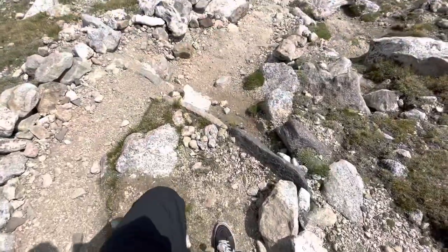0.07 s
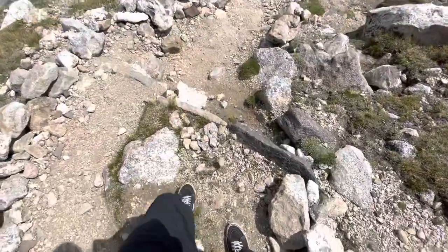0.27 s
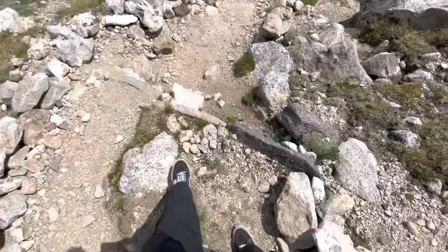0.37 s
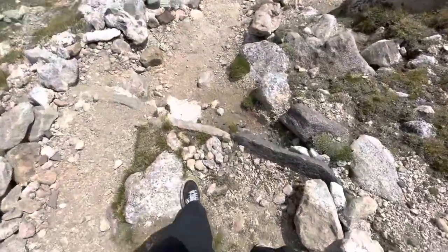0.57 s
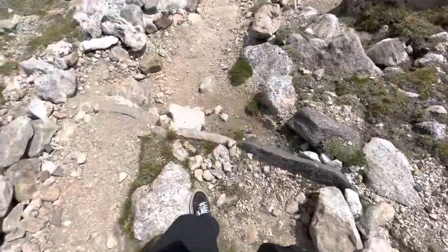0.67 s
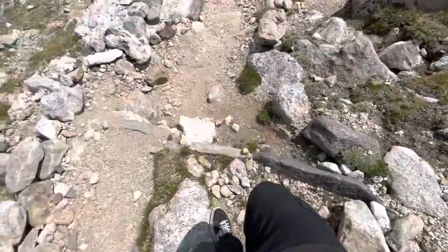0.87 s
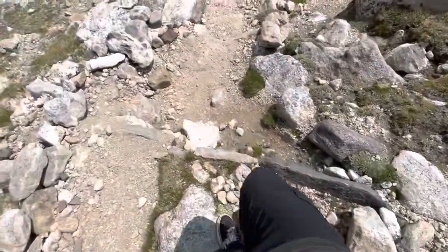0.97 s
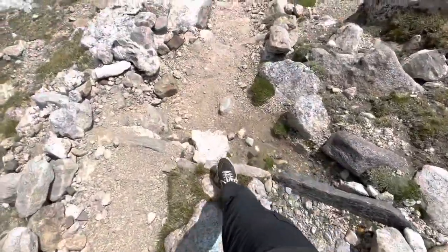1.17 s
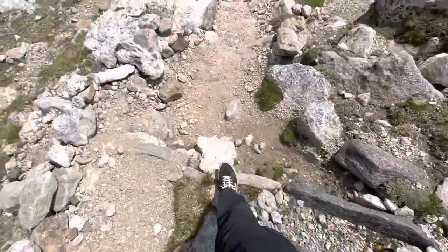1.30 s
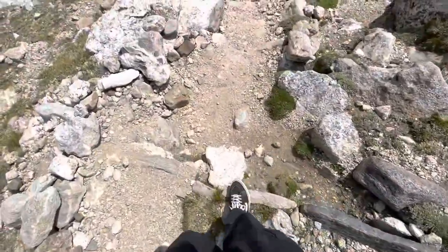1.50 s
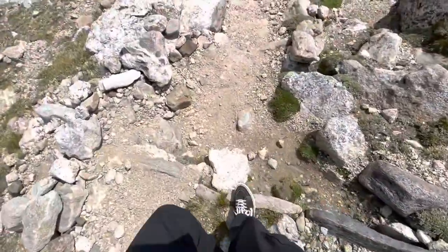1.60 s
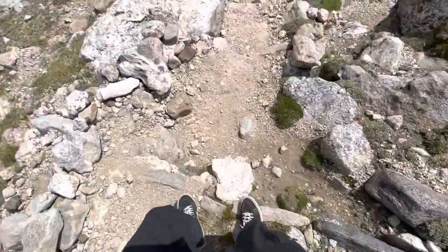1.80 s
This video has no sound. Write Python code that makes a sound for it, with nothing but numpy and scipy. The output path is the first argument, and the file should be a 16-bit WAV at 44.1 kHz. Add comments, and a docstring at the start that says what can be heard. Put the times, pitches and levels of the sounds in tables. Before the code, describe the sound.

Shoes take two steps over loose stones and gravel, knocking small rocks together.

```python
"""Two steps on a dry, stony mountain trail, heard from the walker's chest.
The first lands as a cluster of loose stones knocking under the shoe: hard clack, hollow body, a spit
of grit and, just after, a low thud. Pebbles tick and gravel crunches as the weight rolls on, then
trousers swish and the sole scuffs. At 1.25 s the second lands with one clack, trailed by a scuff, more
pebbles, gravel and a last swish. Soft stride bumps, air rumble and a faint hiss lie underneath."""
import sys
import numpy as np
from scipy import signal
from scipy.fft import rfft, irfft
from scipy.io import wavfile

SR = 44100
rng = np.random.default_rng(int(sys.argv[2]) if len(sys.argv) > 2 else 0)


def inscribe(sig):
    """Save sig as 16-bit PCM at rate SR to the path in sys.argv[1].

    A 1-D sig is mono; a 2-D sig holds one channel per row.
    Samples are clipped to [-1, 1] before scaling.
    """
    pcm = np.round(np.clip(np.atleast_2d(sig).T, -1, 1) * 32767)
    wavfile.write(sys.argv[1], SR, pcm.astype(np.int16))


N = 81585
TIME = np.arange(N) / SR
HIT = int(.12 * SR)   # samples in a one-shot
AGE = np.arange(HIT) / SR
IMPULSE = 1.0 * (AGE == 0)
CLACK_PAN_DB = -3.2   # every pan is left minus right


def knocks():
    """Stone hits stone under the shoe: a clack in a broad snap, hollow body, grit and a low thud."""
    # Stone impacts: start_s, clack_db, clack_hz, clack_octaves, body_db, body_hz, thud_db, thud_hz,
    # grit_db, grit_hz, roughness (0-1), settle_db
    impacts = [(0.246, -10.5, 3650, 1.04, -21, 1200, -38, 344, -19, 11030, 0.87, -7.5),
               (0.248, -8, 3480, 0.65, -17.5, 1200, -24.5, 350, -15.5, 9800, 0.2, -10),
               (0.2995, 3.5, 4870, 0.82, -6, 985, -7.5, 313, 3, 10100, 0.56, -9.5),
               (0.3133, -12, 3770, 1.66, -46, 1000, -23.5, 204, -21, 10600, 0.5, -10),
               (0.432, -18.5, 3100, 1.4, -19, 754, -18, 472, -20, 9000, 0.2, -3),
               (0.4336, -14, 2930, 1.2, -17.5, 1110, -23, 422, -2, 8700, 0.19, -13),
               (0.4428, -3.5, 3150, 1.31, -12.5, 810, -10, 416, -44, 10500, 0.27, -9),
               (.5650, -1, 2770, 0.99, -8.5, 1536, -21.5, 395, -26.5, 10500, 0.14, -20.5),
               (1.249, 2, 2580, 1.22, -7.5, 926, -12.5, 183, -44, 9700, 0.04, -19.5)]
    out = np.zeros((2, N))
    for (start_s, clack_db, clack_hz, octaves, body_db, body_hz, thud_db, thud_hz,
         grit_db, grit_hz, rough, settle_db) in impacts:
        clack = from_db(clack_db) * strike(clack_hz, octaves, rough, settle_db, CLACK_PAN_DB)
        body = from_db(body_db) * strike(body_hz, 1.36, rough / 2, settle_db, pan_db=2.2)
        grit = from_db(grit_db) * strike(grit_hz, 1, rough, settle_db, pan_db=-.6)
        snap = strike(0.754 * clack_hz, 1.59, rough / 2, settle_db, CLACK_PAN_DB)
        snap *= from_db(clack_db - 10.5)
        add(out, start_s, clack + snap + body + grit + from_db(thud_db) * thud(thud_hz))
    return out


def strike(hz, octaves, rough, settle_db, pan_db):
    """A contact excites one damped resonance, with a little scatter between left and right."""
    direct = band(contact(rough, settle_db), hz, octaves, order=4)
    scatter = from_db(-12) * band(contact(0.99, settle_db), hz, octaves, order=4)
    return pan(np.array([direct + scatter, direct - scatter]), pan_db)


def contact(rough, settle_db):
    """One impact with a rasp of crushed sand, a reflection off nearby rock and a tail of settling grit."""
    rasp_s, echo_s, settle_s = .0008, .0016, .0082
    rasp = unit(rng.standard_normal(HIT) * np.exp(-AGE / rasp_s))
    settling = unit(rng.standard_normal(HIT) * np.exp(-AGE / settle_s))
    impact = np.sqrt(1 - rough) * IMPULSE + np.sqrt(rough) * rasp
    echo = from_db(-12) * np.roll(impact, int(echo_s * SR))
    return impact + echo + from_db(settle_db) * settling


def thud(hz):
    """A low thud sounds a few milliseconds after the clack, later the lower its pitch."""
    lag_s = 0.87 / hz
    return np.roll(band(IMPULSE, hz, octaves=0.98, order=3), int(lag_s * SR))


def pebbles():
    """Small stones tip and tick, each with a light thud."""
    # Pebble ticks: start_s, level_db, pitch_hz
    ticks = [(0.3355, -28.5, 3050), (0.359, -23.5, 2070), (0.3695, -20, 1730), (0.393, -22, 2150),
             (0.4007, -27.5, 7400), (0.42, -28, 6500), (0.4513, -28, 9100), (0.4626, -34, 1410),
             (.504, -26, 1020), (.516, -21.5, 760), (0.551, -30, 1660), (0.597, -24.5, 1930),
             (0.616, -26.5, 1424), (0.6473, -16, 1250), (.673, -28, 1520), (0.682, -28.5, 1620),
             (0.694, -32, 1680), (0.7119, -22, 1200), (.718, -44, 1460), (0.787, -35, 1580),
             (1.283, -23.5, 1200), (1.2876, -29.5, 2150), (1.43, -26, 2060), (1.443, -27.5, 1140),
             (1.475, -28, 1170), (1.492, -27.5, 700)]
    out = np.zeros((2, N))
    for start_s, level_db, pitch_hz in ticks:
        tick = strike(pitch_hz, octaves=1.65, rough=0.46, settle_db=-3.5, pan_db=-3)
        add(out, start_s, from_db(level_db) * (tick + from_db(-7.5) * thud(hz=497)))
    return out


def scuffs():
    """The sole slips briefly over sand and sets stone chips clinking."""
    # Slips of the sole: start_s, length_s, level_db, pitch_hz
    slips = [(0.871, 0.0067, -31.5, 3680), (0.958, 0.0041, -36.5, 2640), (1.088, 0.0025, -28.5, 4850),
             (1.369, 0.012, -18, 3900)]
    # Ringing modes of the chips: pitch_hz, level_db, t60_s
    chip_modes = [(2820, 3, 0.0086), (3690, 2.5, 0.016), (4300, 5, 0.024), (4650, -3, .018)]
    ring = sum(from_db(db - 60 * AGE / t60) * np.sin(2 * np.pi * hz * AGE) for hz, db, t60 in chip_modes)
    out = np.zeros((2, N))
    for start_s, length_s, level_db, pitch_hz in slips:
        swell = np.sin(np.pi * np.minimum(AGE / length_s, 1))
        rub = rng.standard_normal(HIT) * rng.exponential(1, HIT) * swell
        scrape = band(rub, pitch_hz, octaves=1)
        clink = from_db(-4) * unit(signal.fftconvolve(rub, ring)[:HIT])
        dust = from_db(-4.5) * unit(rub)
        add(out, start_s, pan(from_db(level_db) * (scrape + clink + dust), CLACK_PAN_DB))
    return out


def bumps():
    """Dull jolts as the leg swings and lands."""
    # Jolts of the stride: start_s, level_db, pitch_hz, pan_db
    jolts = [(0.517, -22.5, 176, -1), (.612, -24, 340, -1), (0.663, -28, 65, 6), (0.89, -28, 237, -1),
             (1.093, -18, 144, 1), (1.120, -26.5, 70, 17), (1.177, -29.5, 80, 17), (1.217, -22, 128, 21),
             (1.251, -25.5, 81, 25), (1.364, -24.5, 95.5, 12), (1.751, -32.5, 74, 14)]
    out = np.zeros((2, N))
    for start_s, level_db, pitch_hz, pan_db in jolts:
        jolt = from_db(level_db) * band(IMPULSE, pitch_hz, octaves=0.81, order=3)
        add(out, start_s, pan(jolt, pan_db))
    return out


def gravel():
    """Gravel crunches under the walker's weight: separate grains over a wash of noise."""
    # Crunch envelope: time_s, level_db
    envelope = [(0, -47), (.1, -58), (.22, -60), (.29, -57), (.32, -56), (.41, -53.5), (.46, -57),
                (.49, -59.5), (.53, -58), (.58, -56), (.72, -55), (.82, -55.5), (.95, -62.5), (1.06, -62.5),
                (1.2, -63.5), (1.31, -58), (1.39, -59.5), (1.44, -48.5), (1.485, -51.5), (1.53, -58),
                (1.6, -57.5), (1.68, -63.5), (1.85, -71)]
    # Gravel tone: frequency_hz, gain_db
    tone = [(30, -18), (100, -6), (200, -5), (380, -1), (750, -5.5), (1200, -8), (2500, -15.5),
            (5000, -12.5), (9000, -24.5), (16000, -44)]
    grain_share = .65   # of the power
    clicks = np.sqrt(grain_share) * colour(grains(per_s=330), tone)
    wash = np.sqrt(1 - grain_share) * colour(noise(alike=0.17), tone)
    return curve(envelope) * (clicks + wash)


def sand():
    """Fine sand crackles under the sole in dense, bright clicks."""
    # Crackle envelope: time_s, level_db
    envelope = [(0, -59.5), (.2, -68.5), (.29, -75), (.325, -54), (.36, -53.5), (.41, -72), (.46, -65),
                (.51, -68), (1.0, -79), (1.05, -57), (1.12, -80), (1.36, -71), (1.44, -63), (1.6, -69.5),
                (1.85, -75)]
    # Sand tone: frequency_hz, gain_db
    tone = [(500, -22), (2000, -7), (3500, -1), (6000, -2), (8500, 0), (12000, -3), (15000, -4),
            (16000, -10)]
    return curve(envelope) * colour(grains(per_s=1300), tone)


def trousers():
    """Trouser legs brush past each other once in each stride."""
    # Cloth swishes: peak_s, width_s, level_db
    swishes = [(.76, 0.032, -68.5), (1.58, 0.053, -67)]
    swell = sum(from_db(db) * np.exp(-.5 * ((TIME - s) / width) ** 2) for s, width, db in swishes)
    cloth = band(noise(alike=.3), hz=7450, octaves=0.51)
    return swell * cloth / cloth.std()


def air():
    """Moving air rumbles on the microphone, heavier on the left."""
    # Rumble envelope: time_s, level_db
    envelope = [(0, -65.5), (.2, -69), (.45, -61.5), (.55, -57), (.7, -64), (.85, -67), (1.03, -83),
                (1.14, -58), (1.3, -54), (1.45, -75), (1.56, -58.5), (1.69, -83), (1.85, -58)]
    # Rumble tone: frequency_hz, gain_db
    tone = [(20, -9), (35, -0.5), (60, -1), (110, 2), (200, -5.5), (500, -18), (2000, -62)]
    return pan(curve(envelope) * colour(noise(alike=0.033), tone), db=5)


def hiss():
    """A faint, steady, wide noise bed."""
    # Hiss tone: frequency_hz, gain_db
    tone = [(20, -9.5), (60, 14), (150, 3.5), (400, 11), (1000, 3), (2500, 2.5), (4500, -4), (5600, -1.5),
            (6500, 7.5), (7600, -9.5), (9200, 0.5), (10700, -56), (12500, -5.5), (14800, -22), (16000, -25)]
    return from_db(-63.5) * colour(noise(alike=0.1), tone)


def port_tone(pair):
    """The two microphone ports put peaks and notches in the treble from the ground."""
    # Port response: frequency_hz, gain_db
    response = [(3000, 0), (3700, -1), (4300, -2), (5100, 1.5), (5750, -10), (6600, -4), (7400, -10),
                (8100, 3), (9300, 3), (10500, -4), (11900, 0), (12900, -6), (15000, -1), (16000, -6)]
    return shape(pair, response)


def port_lag(pair, share):
    """Sound from the ground reaches the right port a little later; share scales the lag."""
    # Full lag of the right port: frequency_hz, lag_rad
    full_lag = [(100, 0), (1000, .25), (2200, .3), (3000, 1.4), (3700, 2.1), (5000, 2.8), (8000, 2),
                (10500, 2.2), (12000, 1), (13000, .1), (16000, 0)]
    lag = share * np.interp(np.fft.rfftfreq(N, 1 / SR), *np.transpose(full_lag))
    return np.array([pair[0], irfft(rfft(pair[1]) * np.exp(-1j * lag), N)])


def grains(per_s):
    """Random clicks of uneven size."""
    spread_db = 3.5
    sizes = from_db(spread_db * np.minimum(rng.exponential(1, N), 4)) * rng.choice([-1, 1], N)
    return sizes * (rng.random(N) < per_s / SR)


def noise(alike):
    """Stereo white noise; alike is the share of power common to both sides."""
    white = rng.standard_normal((3, N))
    return np.sqrt(alike) * white[2] + np.sqrt(1 - alike) * white[:2]


def band(x, hz, octaves, order=2):
    """A broad, heavily damped resonance; energy 1."""
    edges = np.clip([hz / 2 ** (octaves / 2), hz * 2 ** (octaves / 2)], 10, .47 * SR)
    return unit(signal.sosfilt(signal.butter(order, edges, "band", fs=SR, output="sos"), x + 1e-18))


def shape(x, points):
    """EQ through (frequency_hz, gain_db) points."""
    hz, db = np.transpose(points)
    gain_db = np.interp(np.log(np.fft.rfftfreq(N, 1 / SR) + 1), np.log(hz), db)
    return irfft(rfft(x) * from_db(gain_db), N)


def colour(x, points):
    """EQ, then scale to rms 1."""
    shaped = shape(x, points)
    return shaped / shaped.std()


def curve(points):
    """Gain envelope through (time_s, level_db) points."""
    return from_db(np.interp(TIME, *np.transpose(points)))


def pan(x, db):
    """Place in stereo, left louder than right by db."""
    return x * from_db([[db / 2], [-db / 2]])


def add(out, start_s, x):
    """Mix in a one-shot."""
    i = int(start_s * SR)
    out[:, i:i + HIT] += x[:, :N - i]


def from_db(db):
    """Decibels to gain."""
    return 10 ** (np.asarray(db) / 20)


def unit(x):
    """Scale to energy 1."""
    return x / np.sqrt(np.sum(x ** 2) + 1e-20)


def scene():
    """Two footsteps in open air; the second lands more nearly straight ahead, so its stones lag less."""
    rumble, bed = air(), hiss()
    stones = port_tone(knocks() + pebbles() + scuffs())
    turned = TIME > 0.63
    aside = port_lag(stones * ~turned + gravel() + sand() + bed, share=0.94)
    ahead = port_lag(stones * turned, share=0.7)
    return aside + ahead + bumps() + rumble + trousers()


def record(dry):
    """A steep low-pass takes off the very top."""
    cutoff_hz = 15900
    return signal.sosfilt(signal.ellip(10, .2, 80, cutoff_hz, fs=SR, output="sos"), dry)


dry = scene()
out = record(dry)
inscribe(out)
```